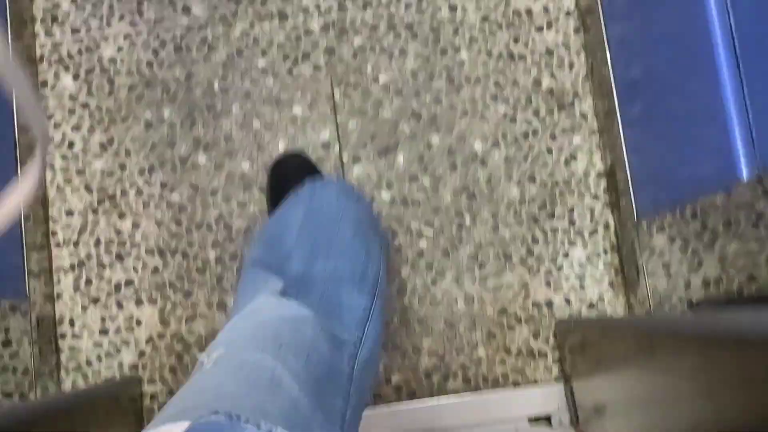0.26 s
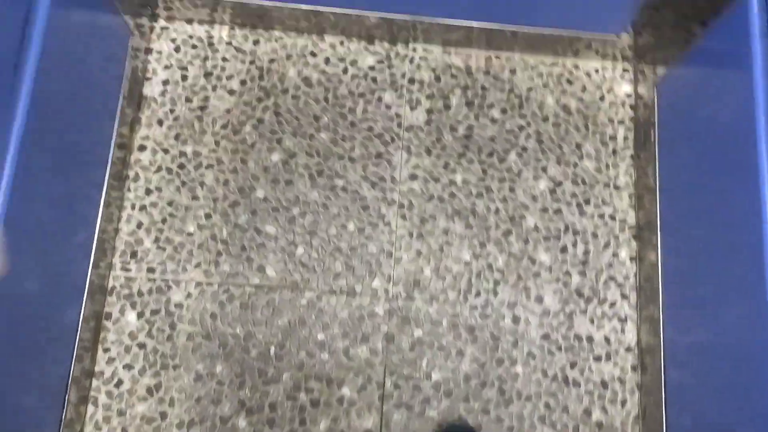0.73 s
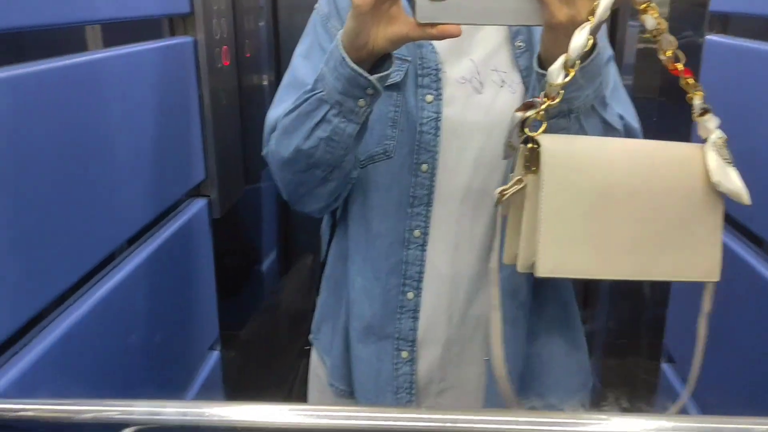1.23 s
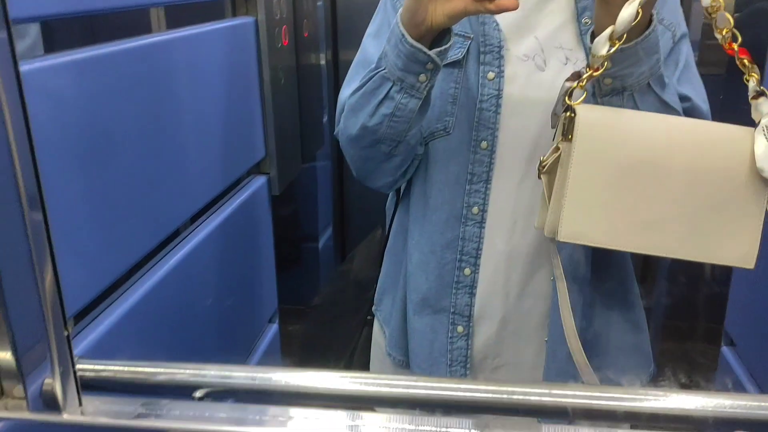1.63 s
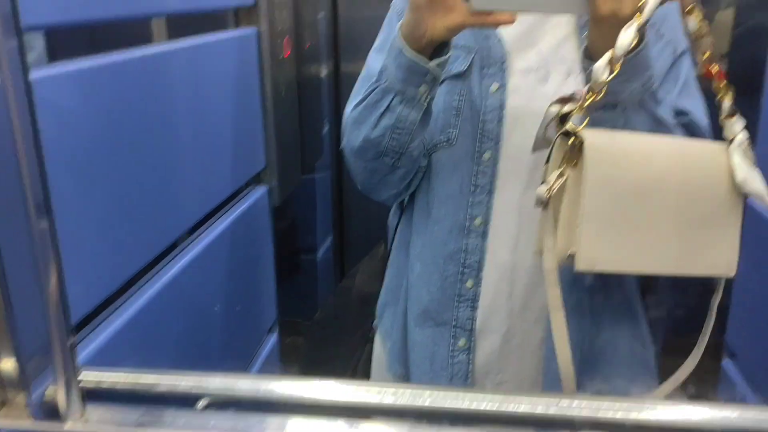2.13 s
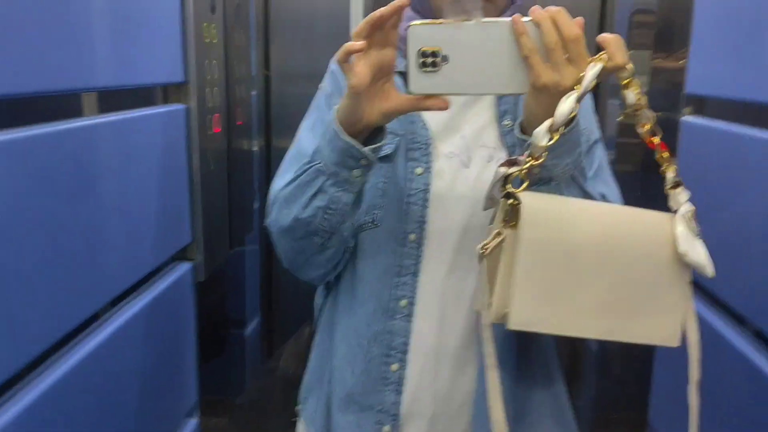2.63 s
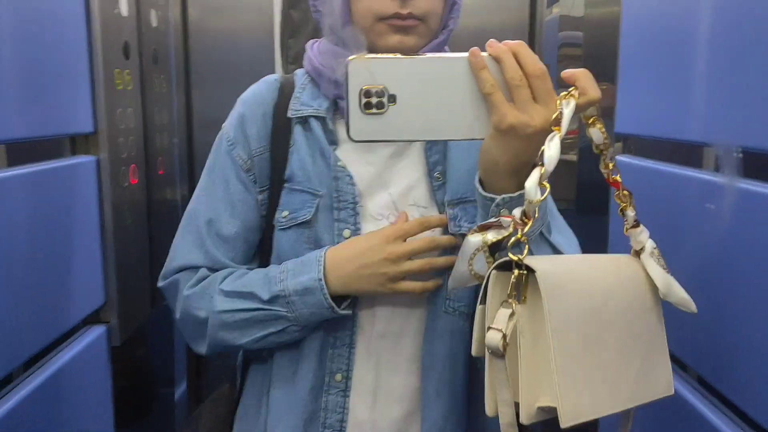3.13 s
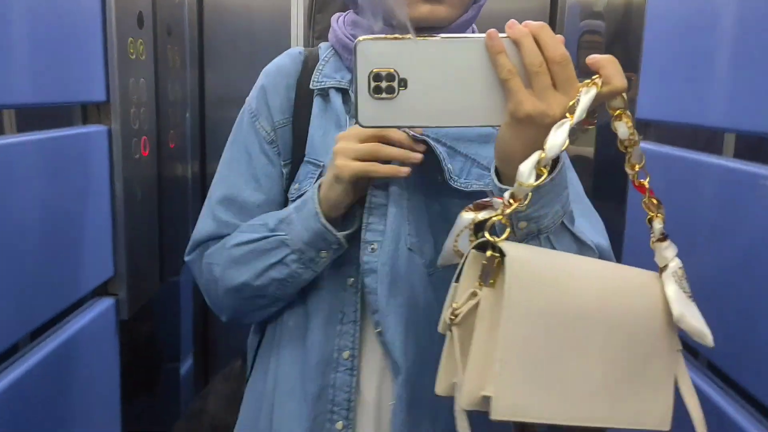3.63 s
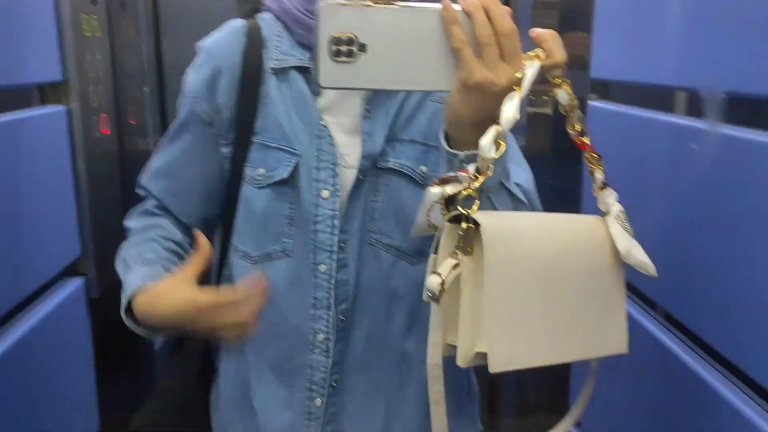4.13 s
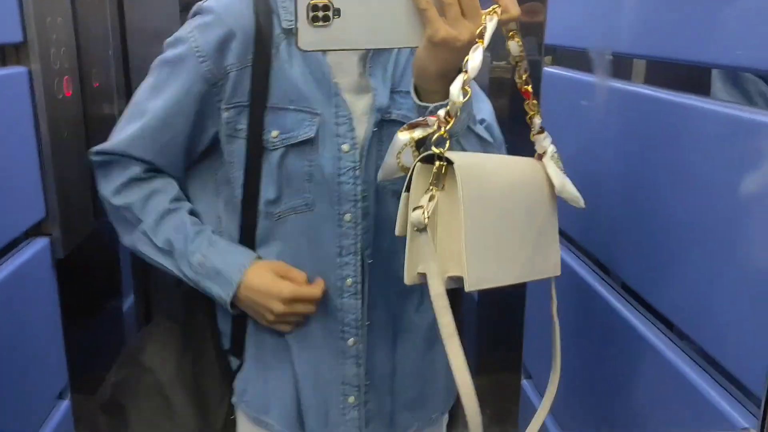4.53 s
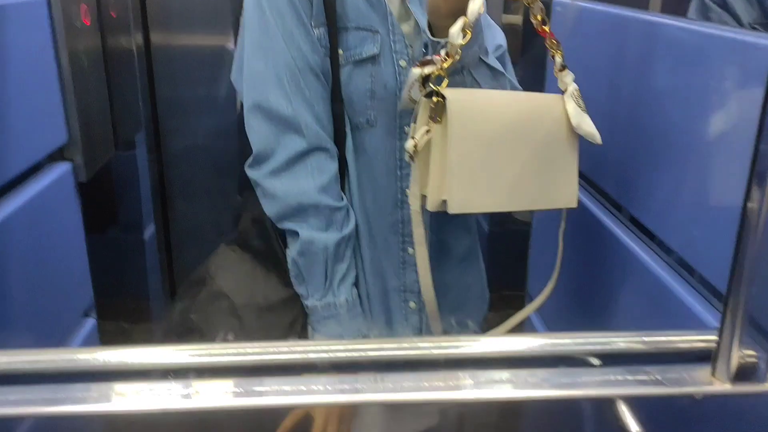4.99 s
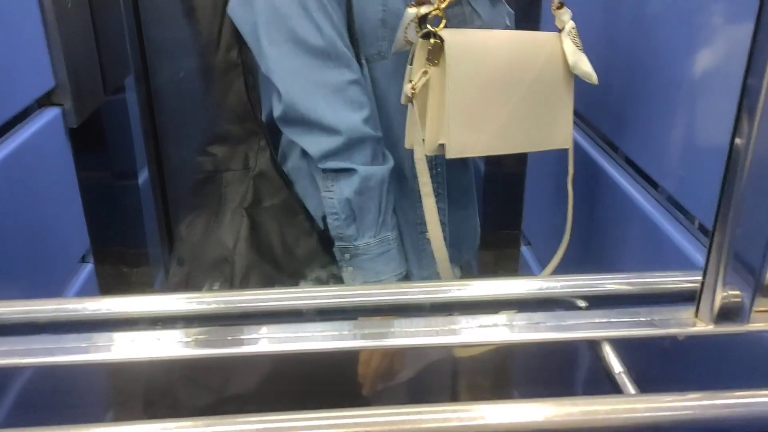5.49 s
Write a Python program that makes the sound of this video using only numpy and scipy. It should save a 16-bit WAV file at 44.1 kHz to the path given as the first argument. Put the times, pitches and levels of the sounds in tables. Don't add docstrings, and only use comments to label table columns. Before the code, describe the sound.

A heavy metal door bangs shut with a booming stairwell echo, then a small lift hums and throbs while cloth rustles and chain links click.

```python
import sys
import numpy as np
from scipy import signal
from scipy.fft import rfft, irfft
from scipy.io import wavfile
from scipy.ndimage import uniform_filter1d

SR = 44100
rng = np.random.default_rng(int(sys.argv[2]) if len(sys.argv) > 2 else 0)


def boost_factor(decibels):
    exponent = np.asarray(decibels, float) / 20
    return 10 ** exponent


def pcm_store(signal):
    levels = np.round(np.clip(np.atleast_2d(signal), -1, 1) * 32767)
    wavfile.write(sys.argv[1], SR, levels.astype(np.int16).T)


N = 253575
TIME = np.arange(N) / SR
CUT_S = 0.776


def evened(x):
    return x / np.sqrt(np.mean(x ** 2) + 1e-20)


def read(points, hz):
    f, value = np.transpose(points)
    return np.interp(np.log(hz + 1), np.log(f + 1), value)


def curve(rows):
    seconds, value = np.transpose(rows)
    return np.interp(TIME, seconds, value)


def add(mix, s, sound):
    part = mix[:, round(s * SR):][:, :sound.shape[1]]
    part += sound[:, :part.shape[1]]


def pan(db):
    return boost_factor(np.array([[db / 2], [-db / 2]]))


def swell(middle, half, edge=2):
    return np.exp(-abs((TIME - middle) / half) ** edge)


def resonances(modes, hz):
    return sum(boost_factor(db) / (1 + (2 * (hz - f) / width) ** 2) for f, width, db in modes)


def noise(gain, size, patchy_db, flicker_db):
    # f/Hz, left-right correlation
    likeness = [(60, 1), (180, 0.8), (540, 0.49), (1640, -0.14), (4940, -0.02), (14900, 0.025)]
    # f/Hz, left minus right level/dB
    tilt = [(60, -1), (180, 7.5), (540, 2.5), (1640, 4), (4940, -5), (14900, 3.5)]
    frames, hz = 4 * N // size + 5, np.fft.rfftfreq(size, 1 / SR)
    a, b, c, d, patches = rng.standard_normal((frames, len(hz), 5)).T
    patches = uniform_filter1d(patches, size=8, axis=0)
    patches = evened(uniform_filter1d(patches, size=10, axis=1))
    flicker = evened(uniform_filter1d(rng.standard_normal(frames), size=3))

    same = np.clip(read(likeness, hz), -1, 1)[:, None]
    left, stranger = a + 1j * b, c + 1j * d
    z = np.array([left, same * left + np.sqrt(1 - same ** 2) * stranger])
    lean = boost_factor(np.outer([0.5, -0.5], read(tilt, hz)))[:, :, None]
    z *= lean * gain(hz)[:, None] * boost_factor(patchy_db * patches + flicker_db * flicker)
    out = signal.istft(z, nperseg=size, noverlap=3 * size // 4)[1][:, :N]
    return out / np.sqrt(np.mean(out.mean(0) ** 2))


def air_mode():
    # t/s, level/dB, f/Hz, half length/s
    jolts = [(0.156, -42, 47.4, 0.074), (0.259, -24, 48.3, 0.014), (0.435, -23, 49.83, 0.099),
             (0.64, -30, 43.7, 0.026), (0.776, -33.5, 44.5, 0.155), (0.984, -37, 46.5, 0.053),
             (1.095, -39.5, 46.9, 0.055), (1.218, -34.5, 46.1, 0.052), (1.332, -41, 45.7, 0.046),
             (1.472, -34.4, 46.2, 0.088), (1.588, -38.5, 44.4, 0.033), (1.702, -32.5, 42.9, 0.048),
             (1.817, -26, 43.4, 0.058), (1.928, -38, 43.5, 0.056), (2.036, -32, 43.8, 0.069),
             (2.151, -19, 43.6, 0.072), (2.297, -25, 44.14, 0.044), (2.473, -28.4, 47.32, 0.19),
             (2.654, -30, 46.8, 0.1), (2.861, -19.5, 48, 0.098), (2.981, -26.5, 47.34, 0.046),
             (3.083, -20.5, 47.17, 0.038), (3.237, -24, 47.34, 0.11), (3.398, -20.5, 48.1, 0.04),
             (3.523, -30.5, 46, 0.041), (3.617, -19.5, 45.75, 0.065), (3.782, -15, 44.7, 0.05),
             (3.959, -15, 43.67, 0.059), (4.15, -19.5, 44.93, 0.069), (4.264, -23, 48.5, 0.038),
             (4.476, -18.5, 47.95, 0.056), (4.617, -17, 43.5, 0.029), (4.694, -23, 44.07, 0.11),
             (4.923, -25, 44, 0.068), (5.115, -29.5, 44.76, 0.068), (5.314, -29, 42.84, 0.062),
             (5.464, -18.5, 42.3, 0.079), (5.57, -25, 42.43, 0.031), (5.643, -23, 44.34, 0.02716),
             (5.73, -24.5, 43.87, 0.03)]
    # f/Hz, level/dB per Hz
    heave = [(12, -25), (20, 19), (30, 24), (40, 8), (52, 8), (62, 6), (72, -14), (90, -53.5)]
    calm, calm_hz = boost_factor(-56), 46
    surges = np.array([boost_factor(db) * swell(s, half) for s, db, hz, half in jolts])
    level = surges.sum(0) + calm
    pitch = (np.array(jolts)[:, 2] @ surges + calm_hz * calm) / level
    boom = level * np.sin(2 * np.pi * np.cumsum(pitch) / SR)

    sway_colour = boost_factor(read(heave, np.fft.rfftfreq(N, 1 / SR)))
    sway = evened(irfft(rfft(rng.standard_normal(N)) * sway_colour, N))
    sway *= uniform_filter1d(level, size=SR // 3) * boost_factor(-12)
    return (np.sqrt(2) * boom + sway) * pan(4.4)


def rumble():
    # f/Hz, level/dB per Hz
    rail = [(36, -23.5), (62, -6), (73, -11), (81, -21.5), (140, -16.5), (198, -26.5), (248, -21),
            (283, -24), (428, -33), (1500, -47), (1950, -71), (3300, -120)]
    # f/Hz, width/Hz, level/dB
    panels = [(73.5, 3, -3), (139.4, 23, -4.5), (166.7, 27, 2.5), (203.8, 12, 11.5), (246, 34, -0.5),
              (313, 47, -7), (430, 45, 2.5), (635, 29, 6.5)]
    # t/s, level/dB
    ride = [(0.0, -37), (0.2, -46.5), (0.84, -42), (1.15, -56.5), (1.45, -50.5), (1.65, -44.5), (2.04, -50),
            (2.35, -45), (2.8, -42), (4.4, -41), (5.75, -42)]

    def walls(hz):
        return boost_factor(read(rail, hz)) * (1.14 + resonances(panels, hz))
    return boost_factor(curve(ride) + 3.5) * noise(walls, size=4096, patchy_db=2.6, flicker_db=1.16)


def drones():
    # start t/s, end t/s, f/Hz, level/dB, waver/dB
    hums = [(.78, 1.87, 101, -47, .5), (2.1, 2.5, 200, -51, 3), (2.35, 3.4, 102, -53, 3),
            (2.36, 3.46, 248, -49, 3), (2.4, 2.9, 172, -52, 3), (2.7, 3.45, 147, -47, 2.5),
            (3.74, 4.18, 100, -48, 2), (4.4, 5.25, 255, -50, 3), (4.41, 5.0, 100, -53, 3),
            (4.9, 5.75, 215, -50, 3), (5.0, 5.2, 145, -48, 3), (5.3, 5.75, 148, -47, 2.5)]
    fade_s, drift_share = 0.026, 0.012
    out = np.zeros(N)
    waver_hz = np.geomspace(2, 9, num=5)[:, None]
    for (start, end, hz, db, waver_db), draws in zip(hums, rng.random((len(hums), 2, 5))):
        waver, drift = (evened(np.sin(2 * np.pi * (waver_hz * TIME + d[:, None])).sum(0)) for d in draws)
        fade = np.clip(np.minimum(TIME - start, end - TIME) / fade_s, 0, 1)
        turns = np.cumsum(hz * (1 + drift_share * waver_db / 3 * drift)) / SR
        out += fade * boost_factor(db + waver_db * waver) * np.sin(2 * np.pi * turns)
    return np.sqrt(2) * out * pan(5.4)


def stroke(s, half):
    end = CUT_S if s < CUT_S else N / SR
    return swell(s, half, edge=1.43) * (TIME < end)


def bursts():
    # t/s, bright peak level/dB, dull level/dB, pan/dB, tail t60/s
    latch = [
        (0.114, -27, -48.5, 0, 0.19),
        (0.2404, -20, -41.5, -3, 0.35),
        (0.247, -30, -33, 1, 0.27),
        (0.372, -13, -30.5, -6.5, 0.25),
        (0.3781, -11.5, -24, -2.5, .2),
        (0.3843, -12.5, -28, 8.5, 0.17),
        (0.393, -11.5, -31, 19, 0.16),
        (0.401, -26, -28, 6.5, 0.24),
        (0.6856, -21, -38, -0.5, 0.09),
    ]
    # t/s, bright peak level/dB, dull level/dB, tail t60/s
    car_clacks = [(0.832, -49, -34.5, 0.2), (1.0396, -69, -50, 0.26), (1.105, -46.5, -48.5, 0.24),
                  (1.2911, -58, -46, 0.29), (1.3082, -39, -48, 0.12), (1.344, -34.5, -46.5, 0.27),
                  (1.464, -38.5, -47.5, 0.21), (1.5525, -51, -56, 0.32), (1.568, -49, -58, 0.3),
                  (1.6774, -54, -46.5, 0.2), (2.3742, -66, -48.5, 0.12), (2.61, -73.5, -62, 0.16),
                  (3.687, -38, -37, 0.093), (3.7821, -62, -42.5, 0.28), (3.875, -18, -37.5, 0.077),
                  (4.028, -50, -38, 0.15), (4.393, -23.5, -33, 0.12), (5.0964, -14, -43, 0.2),
                  (5.5213, -47, -40, 0.21), (5.6776, -47, -53, 0.5), (5.7396, -36, -37, 0.27)]
    # t/s, bright level/dB, dull level/dB, pan/dB, t60/s
    swishes = [(0.2565, -25.5, -20.5, 0.5, 0.38), (1.8655, -40.5, -59.5, 5, 0.53),
               (2.2151, -30.5, -58.5, 9, 0.13), (2.3986, -37, -72, 18, 0.11), (3.134, -36, -40, 4, 0.13),
               (3.455, -31.5, -38, 2, 0.49), (3.6007, -14.5, -36, 0, 0.11), (3.664, -13.5, -24.5, 5, 0.21),
               (3.85, -16, -44, -3, 0.13), (3.89, -42, -39, -1, .2), (4.151, -28, -37.5, -2, 0.81),
               (4.213, -23, -35.5, -2, 0.5), (4.865, -28, -31.5, 0.5, 0.059), (4.998, -28, -31.5, 8, 0.14),
               (5.075, -12, -25, -1.5, 0.22)]
    shape, t = np.zeros((3, 2, N)), np.arange(SR // 2) / SR
    tick = boost_factor(-60 * t / 0.0074) * (1 - np.exp(-t / 0.00048))
    car = [(s, bright_db, dull_db, 0, t60) for s, bright_db, dull_db, t60 in car_clacks]
    for s, bright_db, dull_db, pan_db, t60 in latch + car:
        reflections = boost_factor(-60 * t / t60 - 7) * (1 - np.exp(-t / 0.0032))
        clack = (tick + reflections) * pan(pan_db)
        middle_db = 0.8 * bright_db + 0.2 * dull_db + (-36 if s < CUT_S else -4)
        for band, db in zip(shape, (bright_db - 6, middle_db - 7.5, dull_db + 4.5)):
            add(band, s, boost_factor(db) * clack)

    rise_s = 0.0075
    for s, bright_db, dull_db, pan_db, t60 in swishes:
        brush = boost_factor(-60 * t / t60) * (1 - np.exp(-(t / rise_s) ** 2))
        add(shape[0], s, boost_factor(bright_db - 21.5) * brush * pan(pan_db))
        add(shape[2], s, boost_factor(dull_db - 7.5) * brush * pan(pan_db))
    return shape


def rustle():
    # f/Hz, level/dB per Hz
    fizz_colour = [(1760, -44), (3000, -4.5), (3370, -14.5), (5080, -8), (7390, 4.5), (9190, -6),
                   (10500, -21.5), (12000, -17), (13400, -21.5), (15300, -29.5)]
    # f/Hz, level/dB per Hz
    middle_colour = [(2400, -30.5), (3200, -19), (4200, 7.5), (5200, 4), (6500, -38.5)]
    # f/Hz, level/dB per Hz
    body_colour = [(290, -10), (500, -1.5), (589, -18.5), (707, -9.5), (963, -9), (1500, -10.5), (2430, -9),
                   (3710, -18.5), (5000, -21), (6500, -24.5), (11000, -120)]
    # middle t/s, half length/s, level/dB, body over fizz/dB
    strokes = [(0.0, 0.2, -51.5, 0), (0.261, 0.03, -46.5, 5), (0.52, 0.18, -56, 3.5),
               (0.746, 0.13, -51.5, 5), (0.844, 0.095, -53, 2.5), (1.132, 0.13, -65.5, -6),
               (1.394, 0.027, -65, 17.5), (1.67, 0.097, -63.5, 0), (1.935, 0.2, -70.5, 3),
               (2.149, 0.15, -66.5, -9), (2.513, 0.17, -77.5, 11.5), (2.869, .12, -54, 1.5),
               (3.044, 0.088, -69, 1), (3.218, 0.085, -46.5, -2), (3.436, 0.063, -56.5, 1),
               (3.62, 0.048, -42, -2.5), (3.894, .12, -51.5, -5), (4.272, 0.12, -45.5, -4.5),
               (4.468, 0.13, -52.5, 1), (4.795, 0.13, -52, 1.5), (4.964, 0.15, -51, 4),
               (5.324, 0.19, -53.5, -3), (5.508, 0.071, -64, 2.5)]
    fizz = noise(lambda hz: boost_factor(read(fizz_colour, hz)), size=512, patchy_db=2, flicker_db=1.1)
    middle = noise(lambda hz: boost_factor(read(middle_colour, hz)), size=512, patchy_db=2, flicker_db=1)
    body = noise(lambda hz: boost_factor(read(body_colour, hz)), size=512, patchy_db=2.5, flicker_db=1.3)
    bright, centre, dull = bursts()
    slide, drag = boost_factor(-81.5), boost_factor(-69)
    for s, half, db, body_db in strokes:
        slide = slide + boost_factor(db) * stroke(s, half)
        drag = drag + boost_factor(db + body_db) * stroke(s, half)
    return fizz * (slide + bright) + middle * centre + body * (drag + dull)


def link_ticks():
    # t/s, peak level/dB, f/Hz, pan/dB
    ticks = [(0.115, -11.5, 6900, -1), (.686, -13, 6740, -16), (1.1422, -44, 4670, 2),
             (1.2422, -31.5, 7810, 21), (1.3088, -28, 2620, -4), (1.3447, -29, 7700, 0),
             (1.346, -21.5, 2300, -6), (1.4623, -27, 4260, -7.5), (1.5662, -31.5, 4300, -12),
             (1.7328, -35, 2810, -5), (1.8081, -43, 10500, 5), (1.9562, -36, 8300, 14),
             (2.0187, -43, 2890, 6), (2.1386, -34, 3890, -10.5), (2.1783, -36, 10000, 15),
             (2.2437, -30.5, 8100, 16), (2.2441, -39, 4600, 0), (2.3316, -43.5, 2610, -1),
             (2.3733, -33, 2020, 3), (2.5479, -34, 6660, -18), (3.45, -35, 1750, 3),
             (3.668, -18.5, 2390, 1), (3.6872, -11, 6070, -14), (3.8785, -12.5, 6580, -8),
             (4.2378, -38, 7020, -7), (4.3946, -17, 6850, -5)]
    # t/s, peak level/dB, f/Hz, pan/dB
    more_ticks = [(0.6877, -21, 1800, 0), (0.8319, -23, 1730, 0), (1.0402, -50, 1300, 0),
                  (1.1058, -36, 1490, -2), (1.291, -38, 2754, -6), (1.308, -34, 7010, -10),
                  (1.5538, -39, 2485, -4), (1.6793, -30.5, 2070, -6), (1.8681, -43, 6770, -1),
                  (1.9114, -35, 8460, 5), (1.9636, -40, 10530, 13), (1.9721, -40, 8000, 8),
                  (1.993, -33, 7800, 10), (2.0241, -42, 10500, 10), (2.1636, -40, 10420, 14),
                  (2.2922, -43, 1490, -1.5), (2.6167, -37, 1490, 8), (2.6753, -40, 1380, 2),
                  (2.7197, -39, 6990, -3), (2.7411, -41, 11550, 8), (2.7969, -41.5, 1770, 0),
                  (3.605, -27, 2560, -2), (3.68, -21.5, 2585, 0), (3.7817, -29, 2300, 3),
                  (4.159, -34, 2720, -1), (4.2431, -27.5, 3720, 0), (5.0832, -31, 2550, -4),
                  (5.096, -29, 2530, 0)]
    out, t = np.zeros((2, N)), np.arange(SR // 50) / SR
    for s, db, hz, pan_db in ticks + more_ticks:
        tick = np.sin(2 * np.pi * hz * t) * np.exp(-t * hz / 1.78) * (1 - np.exp(-t * hz * 0.74))
        tick = tick + 0.29 * np.roll(tick, shift=70) - 0.3 * np.roll(tick, shift=190)
        add(out, s, boost_factor(db + 1.5) * tick * pan(pan_db))
    return out


def strap_squeak():
    # t/s, level/dB
    squeak = [
        (5.07, -55),
        (5.084, -44),
        (5.105, -36.5),
        (5.13, -37),
        (5.16, -44),
        (5.2, -60),
    ]
    # f/Hz, width/Hz, level/dB
    strap = [(2560, 260, 0), (1900, 200, -2), (2200, 150, -4), (3000, 250, -1)]
    rows = [(squeak[0][0] - 0.01, -90), *squeak, (squeak[-1][0] + 0.027, -90)]
    rub = noise(lambda hz: resonances(strap, hz), size=1024, patchy_db=1, flicker_db=1.5)
    song = boost_factor(-29) * np.sin(2 * np.pi * 2525 * TIME) + boost_factor(-33) * np.sin(2 * np.pi * 2700 * TIME)
    return rub * boost_factor(curve(rows) + 0.5) + swell(5.106, 0.01) * song * pan(-7)


def knocks():
    # t/s, level/dB, t60/s, brightness/dB per octave
    bumps = [(0.832, -32.5, 0.15, -5.5), (1.038, -42, 0.07, 4), (2.662, -42, .04, 3),
             (3.451, -34.5, 0.032, 4), (3, -38, 0.044, 4), (3.679, -11.5, 0.061, 3.5),
             (3.689, -14.5, 0.034, 2), (3.7034, -19.5, 0.097, -5), (4.3968, -19.5, 0.04, 1.5),
             (4.63, -36, 0.068, -4), (4.865, -30, 0.094, -1)]
    # f/Hz, level/dB
    hollow = [(130, 3.5), (170, 2.5), (260, -7), (330, 4.5), (404, 3.5), (520, 0), (673, 1.5), (840, -6.5),
              (947, 0), (1090, 0), (1380, -7.5), (1830, -16), (2470, -20), (2720, -23)]
    out, t = np.zeros((2, N)), np.arange(SR // 4) / SR
    chance = rng.random((len(bumps), len(hollow), 3))
    for (s, db, t60, bright_db), draws in zip(bumps, chance):
        ring = np.zeros((2, len(t)))
        for (hz, mode_db), (a, b, c) in zip(hollow, draws):
            turns = hz * t + np.array([[b], [b + 0.31 * c]])
            ring += boost_factor(mode_db - 6 * a + bright_db * np.log2(hz / 500)) * np.sin(2 * np.pi * turns)
        add(out, s, boost_factor(db - 9 - 60 * t / t60) * ring * (1 - np.exp(-t / 0.00024)))
    return out


def door():
    # t/s, level/dB, ring factor
    blows = [
        (.217, -6.5, 0.32),
        (.238, 1.5, 0.82),
        (.249, -4, 0.6),
        (0.286, -8, 0.88),
        (0.339, -9, 0.3),
        (.372, -1, 0.44),
        (0.397, -11, 0.73),
        (0.439, -17.5, .45),
    ]
    # f/Hz, level/dB, t60/s
    leaf_modes = [(143, -9, 0.41), (159.4, 1, 0.28), (179.9, 1.5, 0.45), (211.5, 1, 0.52),
                  (245, -3.5, 0.25), (347, -2, 0.22), (416.3, -7.5, 0.73), (509, -4, 0.25),
                  (577.5, -7, 0.22), (740, -13, 0.42), (838, -12.5, 0.18), (964, -12, 0.2),
                  (1047, -16, 0.11), (1106, -17, 0.088)]
    # f/Hz, level/dB per Hz
    shaft = [(41, -45), (70, -16), (102, -20.5), (198, 1.5), (359, -17), (414, -10.5), (462, -23.5),
             (524, -14.5), (1060, -30), (3000, -54), (3900, -94), (6600, -120)]
    out, boom, t = np.zeros((2, N)), np.zeros((2, N)), np.arange(SR // 2) / SR
    boom_fade = np.clip((t[-1] - t) / 0.0095, 0, 1)
    chance = rng.random((len(blows), len(leaf_modes), 3))
    for (s, db, ring), draws in zip(blows, chance):
        leaf = np.zeros((2, len(t)))
        for (hz, mode_db, t60), (a, b, c) in zip(leaf_modes, draws):
            port_shift = np.array([[0], [(b - 0.5) * hz / 500]])
            turns = hz * (1 + 0.027 * (a - 0.5)) * t + port_shift
            decay_db = 60 * t / max(ring * t60, 0.05)
            leaf += boost_factor(mode_db - 2.1 * c - decay_db) * np.sin(2 * np.pi * turns)
        add(out, s, boost_factor(db - 7.5) * leaf * (1 - np.exp(-t / 0.0084)) * pan(0.98))
        boom_level = boost_factor(db - 20.5 - 60 * t / 0.72) * (1 - np.exp(-t / 0.0031))
        add(boom, s, (boom_level * boom_fade)[None])

    swing = np.sin(2 * np.pi * 159 * TIME) + 0.44 * np.sin(2 * np.pi * 182 * TIME)
    out += boost_factor(-26.5 - 60 * TIME / 1.34) * swing * pan(4.5)
    out += boom * noise(lambda hz: boost_factor(read(shaft, hz)), size=2048, patchy_db=1.24, flicker_db=-1.8)
    return out * np.clip((CUT_S - TIME) / 0.0044, 0, 1)


def scene():
    dip = 1 - 1.09 * np.exp(-((TIME - CUT_S) / 0.0052) ** 2)
    car = air_mode() + rumble() + drones()
    handling = rustle() + link_ticks() + strap_squeak() + knocks()
    return dip * (car + handling + door())


def low_pass(x):
    return signal.sosfilt(signal.butter(12, 15490, fs=SR, output="sos"), x)


def record(dry):
    lowpass = signal.firwin(255, 15300, fs=SR)
    limited = signal.oaconvolve(np.clip(dry, -1, 1), lowpass[None], "same")
    return low_pass(limited)


dry = scene()
out = record(dry)
pcm_store(out)
```